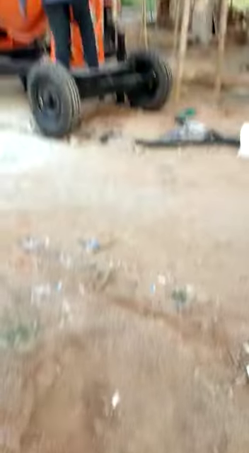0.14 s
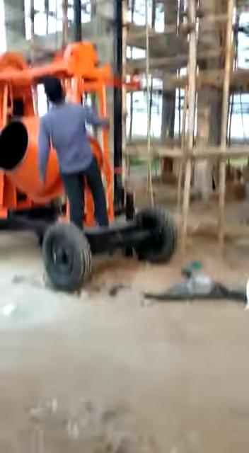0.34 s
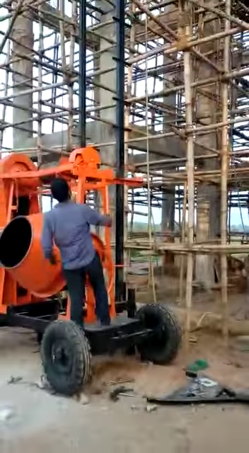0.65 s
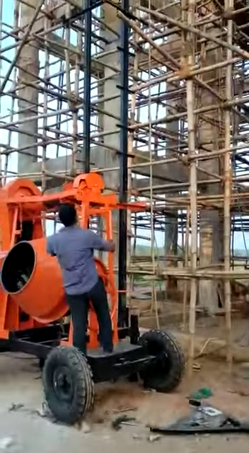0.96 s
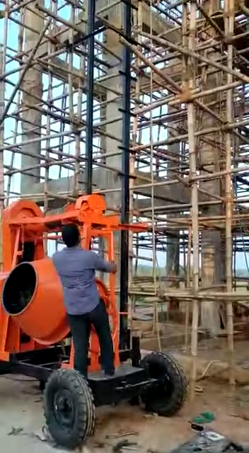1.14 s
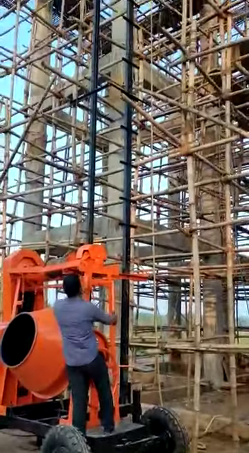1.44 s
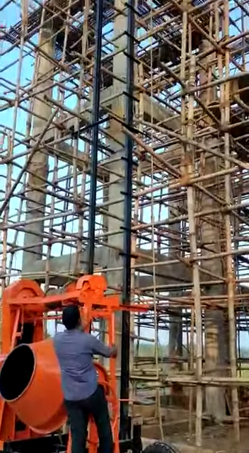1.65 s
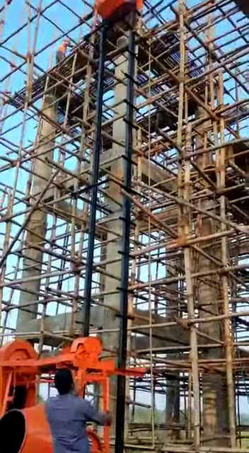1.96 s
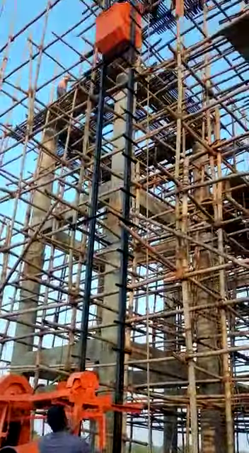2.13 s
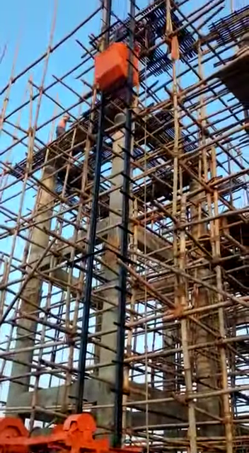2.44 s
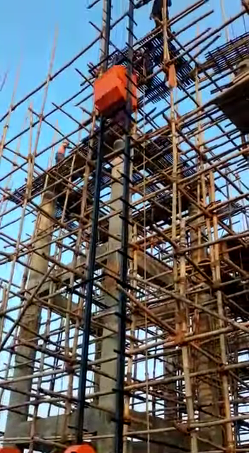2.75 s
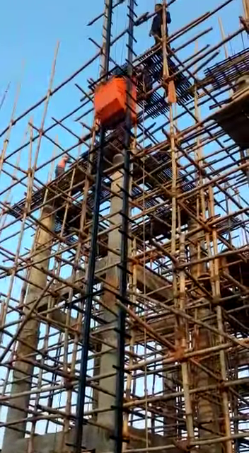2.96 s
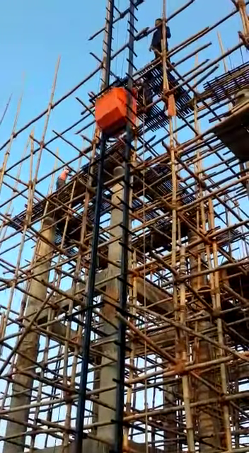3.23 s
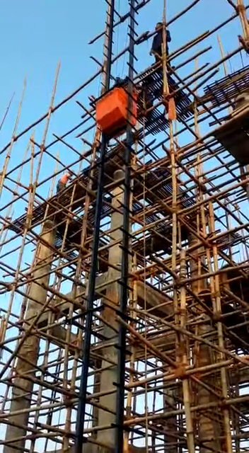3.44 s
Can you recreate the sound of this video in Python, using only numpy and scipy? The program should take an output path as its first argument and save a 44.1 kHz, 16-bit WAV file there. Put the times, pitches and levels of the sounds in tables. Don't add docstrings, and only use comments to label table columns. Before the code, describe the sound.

Small diesel concrete mixer roars continuously up close, with metallic rattling and stones knocking its drum

```python
import sys
import numpy as np
from scipy import signal
from scipy.fft import rfft, irfft, next_fast_len
from scipy.io import wavfile
from scipy.ndimage import uniform_filter1d

SR = 44100
rng = np.random.default_rng(int(sys.argv[2]) if len(sys.argv) > 2 else 0)


def magnitude_from_level(level_db):
    exponent = np.asarray(level_db, float) / 20
    return 10 ** exponent


def transcribe(signal):
    frames = np.atleast_2d(signal).T
    limited = np.clip(frames, -1, 1)
    pcm = np.round(limited * 32767).astype(np.int16)
    wavfile.write(sys.argv[1], SR, pcm)


N = 158319
T = np.arange(N) / SR

SHAFT_HZ = 41.7
OPEN_S = 0.1844
IMPACTS_PER_S = 3000
TICK_SPREAD_DB, PART_DRIFT_DB = -3, 3.2


def evened(x):
    return x / np.sqrt(np.mean(x ** 2) + 1e-20)


def read(points, hz):
    f, value = np.transpose(points)
    return np.interp(np.log(hz + 1), np.log(f + 1), value)


def colour(x, points):
    size = next_fast_len(N + 4096)
    gain = magnitude_from_level(read(points, np.fft.rfftfreq(size, 1 / SR)))
    return irfft(rfft(x, size) * gain, size)[:N]


def ring(x, hz, width):
    r = np.exp(-np.pi * width / SR)
    return 2 * signal.lfilter([1 - r], [1, -r * np.exp(2j * np.pi * hz / SR)], x).real


def resonate(x, hz, width):
    turn = np.exp(2j * np.pi * np.cumsum(hz * np.ones(len(x))) / SR)
    r = np.exp(-np.pi * width / SR)
    return 2 * (turn * signal.lfilter([1 - r], [1, -r], x / turn)).real


def drift(size):
    return evened(uniform_filter1d(uniform_filter1d(rng.standard_normal(N), size), size))


def burst(t, start, length, rise, fall):
    up = np.clip((t - start) / rise, 0, 1)
    return up * up * (3 - 2 * up) * np.exp(-np.maximum(t - start - length, 0) / fall)


def ticks(rate):
    chance, size, sign = rng.random(N), rng.exponential(1, N), rng.standard_normal(N)
    return evened((chance < rate / SR) * magnitude_from_level(TICK_SPREAD_DB * np.minimum(size, 4)) * sign)


def treble(x, db, hz):
    high = signal.sosfiltfilt(signal.butter(2, hz, "high", fs=SR, output="sos"), x)
    return x + (magnitude_from_level(db) - 1) * high


def ringing(hits, parts):
    return sum(magnitude_from_level(db + PART_DRIFT_DB * drift(size=1500)) * evened(ring(hits, f, w))
               for f, w, db in parts)


def roar():
    # f/Hz, density/(dB per Hz)
    roar_colour = [(25, -20), (80, -9), (300, -7.5), (1020, -2), (1200, 1), (1700, 0), (3000, -5),
                   (15500, -21.5)]
    level_db, patch_db, flicker_db = -24, 1.5, 1.1
    patches = rng.standard_normal((N // 128 + 6, 257))
    patches = uniform_filter1d(patches, size=20, axis=0)
    patches = evened(uniform_filter1d(patches, size=6, axis=1))
    z = signal.stft(rng.standard_normal(N), nperseg=512, noverlap=384)[2]
    z = z * magnitude_from_level(patch_db * patches[:z.shape[1]].T)
    noise = signal.istft(z, nperseg=512, noverlap=384)[1][:N]
    return magnitude_from_level(level_db + flicker_db * drift(size=600)) * evened(colour(noise, roar_colour))


def hum():
    # multiple of the shaft rate/1, level/dB
    shaft_orders = [(2, -8), (3, -15), (5.9, -13), (6.8, -11), (15.8, -9), (16.7, -11)]
    # t/s, length/s, level/dB
    exhaust_booms = [(0.35, 0.077, -22), (0.781, 0.086, -30), (1.083, 0.043, -27), (1.246, 0.086, -24),
                     (1.384, 0.039, -21.5), (1.572, .035, -29), (1.635, .045, -17), (2.137, 0.084, -27.5),
                     (2.338, 0.016, -21), (2.724, 0.062, -23), (2.864, 0.063, -25), (2.964, 0.02, -29),
                     (3.174, 0.032, -27), (3.225, 0.029, -23.5), (3.335, 0.13, -31.5)]
    # t/s, length/s, level/dB, multiple of the shaft rate/1
    order_throbs = [
        (0.262, 0.052, -35, 5.93),
        (0.504, 0.053, -35.5, 5.93),
        (1.257, 0.045, -36, 5.87),
        (1.467, 0.024, -31, 1.98),
        (1.808, 0.061, -35, 5.87),
        (2.045, .03, -38, 2.02),
        (3.247, 0.085, -35.5, 5.87),
    ]
    hum_db, blur_hz, wander = -37.5, 20, 0.0052
    edge_s, idle_db, wobble_db, trim_db, slip_turns = 0.024, -43, 3.5, -13, 0.11

    def blurred(hz):
        return evened(ring(ring(rng.standard_normal(N), hz, blur_hz), hz, blur_hz))

    def swelling(start, length):
        return burst(T, start - edge_s / 2, length, edge_s, edge_s)

    lines = sum(magnitude_from_level(db) * blurred(k * SHAFT_HZ) for k, db in shaft_orders)
    swell = magnitude_from_level(idle_db + wobble_db * drift(size=1200))
    swell = swell + sum(magnitude_from_level(db + trim_db) * swelling(s, d) for s, d, db in exhaust_booms)
    shaft = np.cumsum(SHAFT_HZ * (1 + wander * drift(size=8000))) / SR
    fourth = swell * np.sin(2 * np.pi * (4 * shaft + slip_turns * drift(size=2500)))
    throbs = sum(magnitude_from_level(db) * swelling(s, d) * np.sin(2 * np.pi * k * shaft)
                 for s, d, db, k in order_throbs)
    return magnitude_from_level(hum_db) * evened(lines) + np.sqrt(2) * (fourth + throbs)


def rattle(guard_db):
    # t/s, length/s, level/dB, brightness/dB
    rattle_bursts = [(0.211, 0.16, -24, -4.5), (0.42, 0.061, -34, -4), (0.585, 0.082, -32, -7),
                     (0.712, 0.051, -32, 1), (0.772, 0.03, -29, 4), (0.836, 0.064, -30.5, 1),
                     (0.95, 0.12, -34, -5), (1.106, 0.072, -26.5, 0.5), (1.246, 0.062, -30, 0),
                     (1.299, 0.021, -25.5, 5), (1.33, 0.14, -26.5, 1), (1.483, 0.14, -30.5, 4),
                     (1.619, 0.073, -24.5, -5), (1.655, 0.063, -30.5, 9), (1.753, 0.016, -33, 16),
                     (1.817, 0.05, -24.5, -2.5), (1.85, 0.02, -21.5, 10), (1.966, 0.13, -26.5, -3),
                     (2.053, 0.052, -27, 3), (2.164, .03, -29.5, 8), (2.183, 0.093, -21.5, 0.5),
                     (2.352, 0.16, -21.5, 0.5), (2.54, 0.056, -26.5, 1), (2.685, 0.018, -28, -11),
                     (2.752, 0.044, -23, 0), (2.928, 0.14, -19.5, -2), (3.081, 0.025, -20, -1),
                     (3.11, 0.031, -24, 0), (3.196, 0.028, -24, -1.5), (3.366, 0.045, -24.5, -1),
                     (3.414, 0.083, -21.5, 0.5), (3.567, 0.036, -24.5, -2)]
    # f/Hz, density/(dB per Hz)
    tick_colour = [(500, -6.5), (1020, -3), (1250, 3), (2900, 2), (6200, -2.5), (9000, -4.5), (11000, -6.5),
                   (15500, -19)]
    # f/Hz, width/Hz, level/dB
    loose_parts = [(5760, 130, -14), (6050, 80, -17), (6450, 120, -14), (7080, 80, -23), (8140, 130, -18),
                   (9340, 80, -21), (10750, 350, -14), (11150, 150, -18)]
    # f/Hz, width/Hz, level/dB
    guard_modes = [(2835, 50, -26.5), (3063, 17, -24), (3230, 990, -15)]
    ticks_per_s, rise_s, fall_s = 9000, 0.011, 0.032
    idle_db, trim_db, flutter_db = -35, 2, 1
    guard_follow, guard_ref_db = 0.56, -30
    shapes = np.array([magnitude_from_level(db) * burst(T, s - rise_s / 2, d, rise_s, fall_s)
                       for s, d, db, _ in rattle_bursts])
    force = np.sqrt(magnitude_from_level(2 * idle_db) + (shapes ** 2).sum(0))
    bright_db = np.array(rattle_bursts)[:, 3] @ shapes ** 2 / force ** 2
    steadied = (force / magnitude_from_level(guard_ref_db)) ** (guard_follow - 1)
    hits, knocks = ticks(ticks_per_s), ticks(ticks_per_s)
    body = evened(colour(hits, tick_colour)) + ringing(knocks, loose_parts)
    body = body + magnitude_from_level(guard_db) * steadied * ringing(knocks, guard_modes)
    return treble(body, bright_db, 9000) * force * magnitude_from_level(trim_db + flutter_db * drift(size=300))


def drum():
    # t/s, length/s, level/dB, f/Hz
    stone_strikes = [(0.186, .06, -20, 1160), (0.26, 0.11, -20, 1370), (0.613, 0.092, -21.5, 1320),
                     (0.759, 0.03, -18, 1780), (0.949, 0.024, -14.5, 1440), (1.12, 0.047, -17, 1710),
                     (1.297, 0.03, -17, 1410), (1.335, 0.022, -34, 1320), (1.462, 0.021, -15, 1300),
                     (1.957, 0.066, -19.5, 1700), (2.022, 0.045, -18, 1480), (2.106, 0.11, -19, 1620),
                     (2.21, 0.16, -22, 1570), (2.267, 0.056, -17.5, 1540), (2.335, 0.12, -24, 1600),
                     (2.53, 0.11, -26, 1403), (2.614, 0.15, -18, 1440), (2.786, 0.032, -17, 1296),
                     (2.897, 0.049, -24, 1364), (3.144, 0.028, -23, 1310), (3.207, 0.046, -19.5, 1310),
                     (3.266, 0.075, -16.5, 1300), (3.388, 0.08, -21, 1530), (3.512, 0.042, -26, 1460)]
    rise_s, fall_s, trim_db = 0.008, 0.015, -7
    width_hz, sag_per_s = 340, 0.31
    hits, out = ticks(IMPACTS_PER_S), np.zeros(N)
    for s, d, db, hz in stone_strikes:
        span = slice(round(s * SR), round((s + d + 6 * fall_s) * SR))
        pitch = hz * (1 - sag_per_s * (T[span] - s - d / 2))
        thud = resonate(resonate(hits[span], pitch, width_hz), pitch, width_hz)
        out[span] += magnitude_from_level(db + trim_db) * evened(thud) * burst(T[span], s, d, rise_s, fall_s)
    return out


def struck_modes(rows, trim_db):
    rise_s, fall_s, waver_share, flutter_db = 0.008, 0.013, 0.018, 3.5
    waver, flutter, out = drift(size=120), magnitude_from_level(flutter_db * drift(size=110)), np.zeros(N)
    for s, d, db, hz in rows:
        start = s - rise_s
        span = slice(round(start * SR), round((s + d + 6 * fall_s) * SR))
        tone = np.sin(2 * np.pi * np.cumsum(hz * (1 + waver_share * waver[span])) / SR)
        out[span] += magnitude_from_level(db + trim_db) * tone * burst(T[span], start, d + rise_s, rise_s, fall_s)
    return np.sqrt(2) * flutter * out


def drum_rings():
    # t/s, length/s, level/dB, f/Hz
    shell_modes = [(0.242, 0.016, -26, 1222), (0.262, 0.028, -24, 1593), (0.306, 0.082, -28, 1415),
                   (0.614, 0.015, -34, 1307), (0.782, 0.025, -25.5, 1894), (0.875, 0.024, -27, 1238),
                   (0.959, 0.055, -32, 1502), (1.354, 0.021, -28, 1244), (1.473, 0.023, -29.5, 1720),
                   (1.882, 0.011, -29.0, 1235), (1.969, 0.025, -21.5, 1780), (1.992, 0.023, -29, 1900),
                   (2.03, 0.058, -28.6, 1518), (2.111, 0.026, -26.5, 1730), (2.123, 0.029, -26.3, 1507),
                   (2.146, 0.045, -34, 1302), (2.175, 0.0092, -31, 1780), (2.216, 0.018, -31, 1890),
                   (2.268, 0.053, -27, 1496), (2.277, 0.032, -34, 1614), (2.48, 0.013, -27, 1780),
                   (2.535, 0.057, -29.2, 1374), (2.602, 0.078, -32, 1603), (2.622, 0.037, -26.9, 1414),
                   (2.639, 0.025, -30, 1227), (2.683, 0.008, -31, 1291), (2.683, 0.03, -28, 1410),
                   (2.715, 0.034, -25, 1302), (2.744, 0.017, -32, 1490), (2.747, 0.032, -29.4, 1660),
                   (2.837, 0.011, -24, 1205), (2.901, 0.068, -27.5, 1350), (2.906, 0.033, -28.5, 1221),
                   (2.918, 0.045, -27.5, 1787), (3.147, 0.012, -22.5, 2077), (3.156, 0.026, -24.5, 1259),
                   (3.211, 0.107, -35, 1395), (3.223, 0.022, -24.5, 1297), (3.237, 0.011, -27, 1480),
                   (3.342, 0.015, -24.5, 1282), (3.394, 0.008, -21.5, 1447), (3.426, 0.008, -29, 1475),
                   (3.438, 0.026, -35, 1730), (3.441, 0.055, -35, 1850), (3.539, 0.011, -26.4, 1500),
                   (3.571, 0.0095, -28.2, 1207)]
    return struck_modes(shell_modes, 0.5)


def clanks():
    # t/s, length/s, level/dB, f/Hz
    frame_clanks = [(0.219, 0.032, -33, 2896), (0.271, 0.09, -33, 3025), (0.335, 0.02, -28.5, 2820),
                    (1.12, .05, -32, 3060), (1.339, 0.072, -31.5, 2860), (1.557, 0.014, -33, 2863),
                    (1.621, 0.02, -32, 2810), (2.683, 0.017, -31.5, 2627), (2.941, 0.043, -31, 2400),
                    (2.947, 0.023, -32, 2637), (3.144, 0.011, -30, 2196), (3.203, 0.017, -31, 2583)]
    return struck_modes(frame_clanks, 2.5)


def cable_whine():
    level_db, centre_hz, width_hz, wander = -47, 10500, 670, 0.034
    hz = centre_hz * (1 + wander * drift(size=2500))
    grains = ticks(IMPACTS_PER_S) * magnitude_from_level(PART_DRIFT_DB * drift(size=600))
    return magnitude_from_level(level_db) * evened(resonate(resonate(grains, hz, width_hz), hz, width_hz))


def fan():
    # f/Hz, density/(dB per Hz)
    hiss_colour = [(8500, -25.5), (10200, 1), (11500, 4), (12800, 7), (13500, 2), (15700, 2.5)]
    level_db, flutter_db = -36.5, 1.2
    hiss = evened(colour(rng.standard_normal(N), hiss_colour))
    return magnitude_from_level(level_db + flutter_db * drift(size=700)) * hiss


def scene():
    # t/s, roar nearness/dB, fan/dB, guard/dB, cable/dB
    phone_aim = [(.18, -2.5, 3, 14, -12), (.35, 0, 3, 15.5, -9), (.55, 1, 4.5, 14, -4),
                 (1., 0.5, 8.5, 14, 4), (1.4, 3, 8.5, 13.5, 10), (1.7, 0.5, 6, 12, 20),
                 (1.8, -0.5, 7, -4, 5), (1.95, 0.5, 2, 4, 14.5), (2.3, 1.5, 4, 7.5, 1),
                 (2.7, 3.5, 4, -5, -6), (2.87, 2.5, 6, -20, -8), (3.0, 1, 3, 0, -8),
                 (3.3, 3.5, 4.5, -18, -8), (3.59, 3.5, 8, -6, -6)]
    veil_db, veil_s, veil_from_hz = -13, 0.05, 6600
    s, near_db, fan_db, guard_db, cable_db = np.transpose(phone_aim)
    mix = roar() * magnitude_from_level(np.interp(T, s, near_db)) + hum()
    mix = mix + rattle(np.interp(T, s, guard_db)) + drum()
    veil = veil_db * np.exp(-np.maximum(T - OPEN_S, 0) / veil_s)
    mix = treble(mix, veil, veil_from_hz)
    mix = mix + drum_rings() + clanks()
    mix = mix + cable_whine() * magnitude_from_level(np.interp(T, s, cable_db))
    mix = mix + fan() * magnitude_from_level(np.interp(T, s, fan_db))
    return np.array([mix, mix])


def top_cut(x):
    return signal.sosfilt(signal.butter(12, 16280, fs=SR, output="sos"), x)


def record(dry):
    # f/Hz, gain/dB
    port_colour = [(350, 1), (490, -6), (640, 0), (3170, -1.5), (3290, -5.5), (4700, -7.5), (5300, -4),
                   (5800, -2)]
    ceiling, edge_hz = 0.56, 15730
    notch_hz, notch_width_hz, notch_share = 4620, 300, 0.45
    t = np.maximum(T - OPEN_S, 0)
    offset = 0.075 * np.exp(-t / 0.035) - 0.026 * np.exp(-t / 0.62)
    x = colour(dry[0], port_colour)
    x = x - notch_share * ring(x, notch_hz, notch_width_hz)
    x = (ceiling * np.tanh(x / ceiling) + offset) * (T >= OPEN_S)
    band = signal.firwin(1023, edge_hz, window=("kaiser", 10), fs=SR)
    x = signal.oaconvolve(x, band, "same")
    return top_cut(np.array([x, x]))


dry = scene()
out = record(dry)
transcribe(out)
```